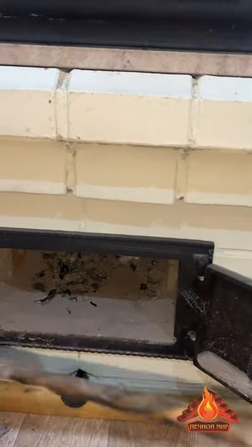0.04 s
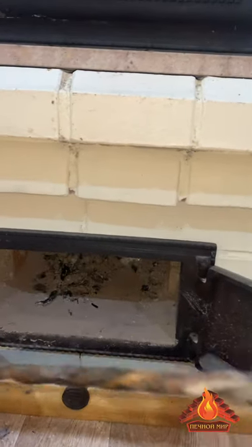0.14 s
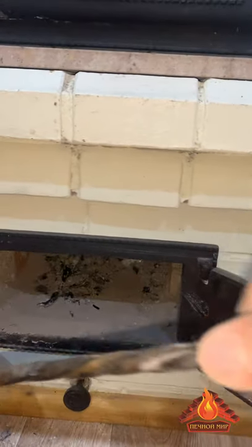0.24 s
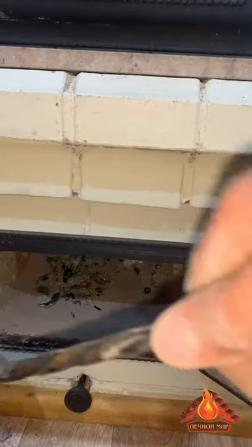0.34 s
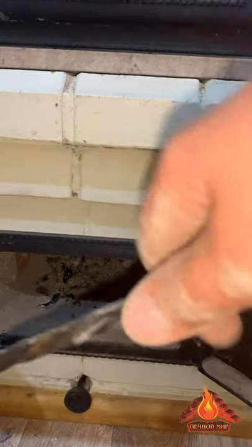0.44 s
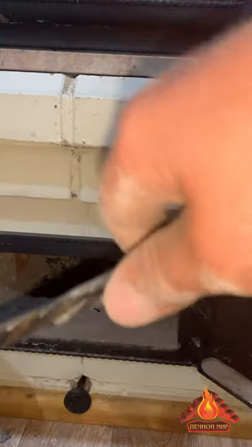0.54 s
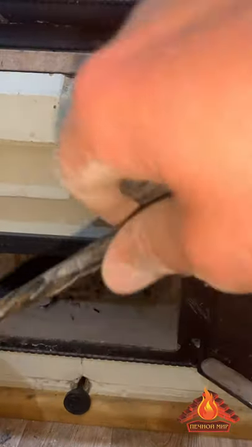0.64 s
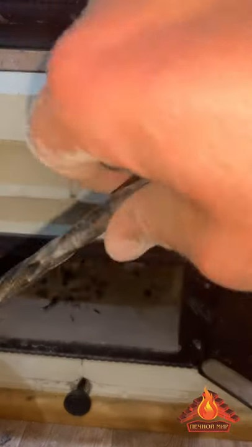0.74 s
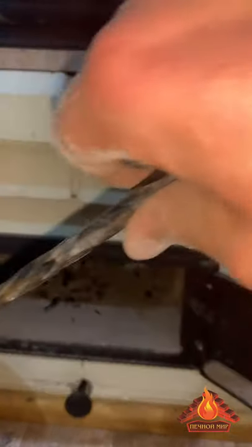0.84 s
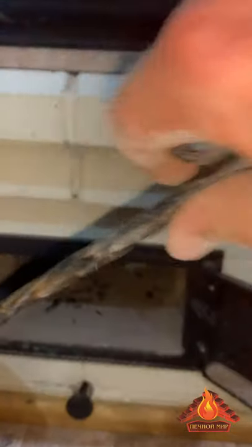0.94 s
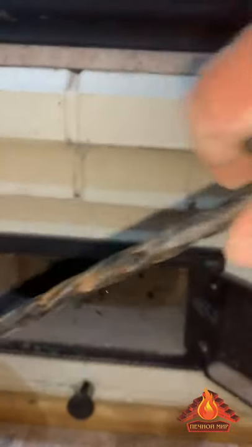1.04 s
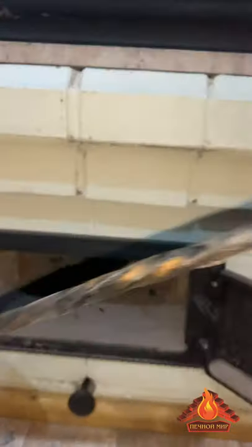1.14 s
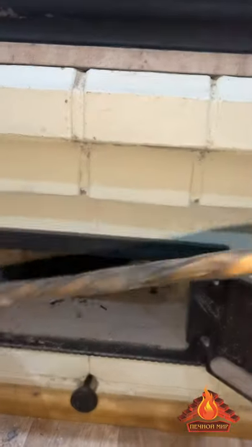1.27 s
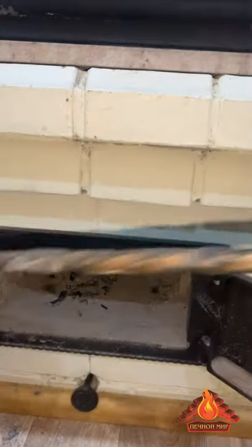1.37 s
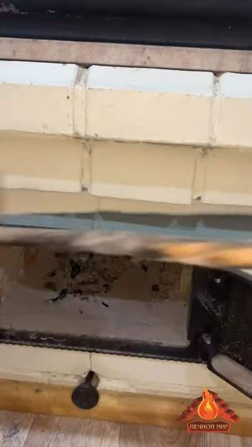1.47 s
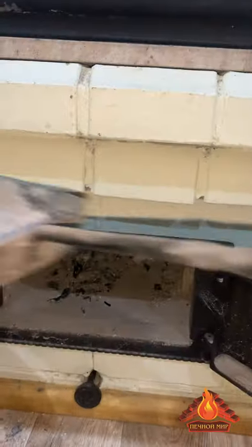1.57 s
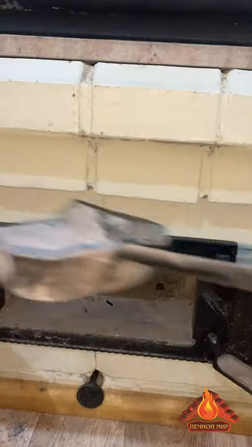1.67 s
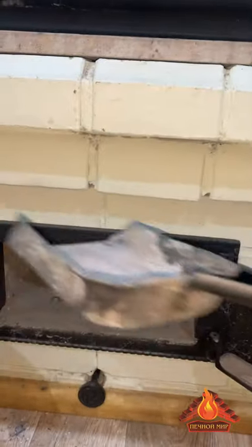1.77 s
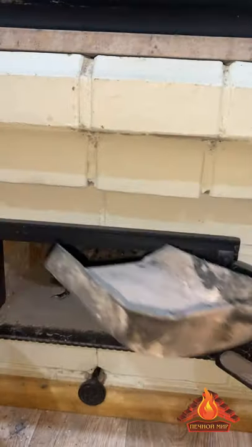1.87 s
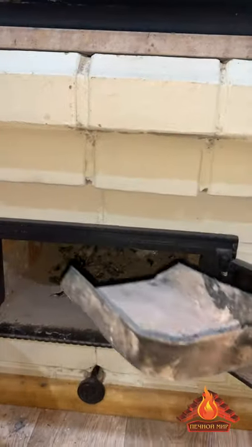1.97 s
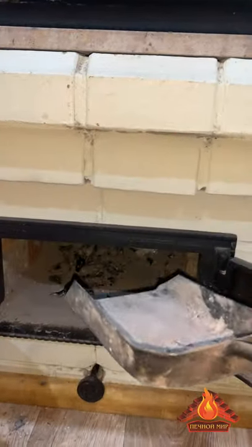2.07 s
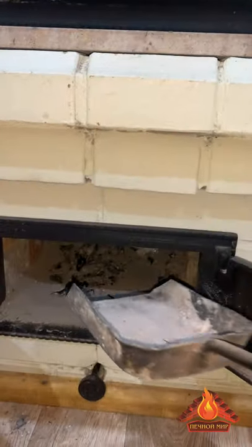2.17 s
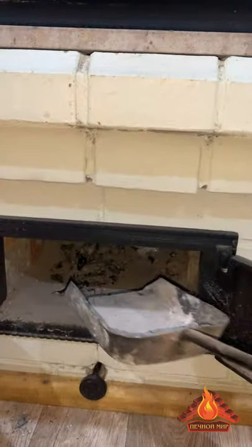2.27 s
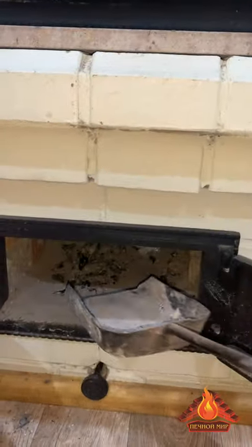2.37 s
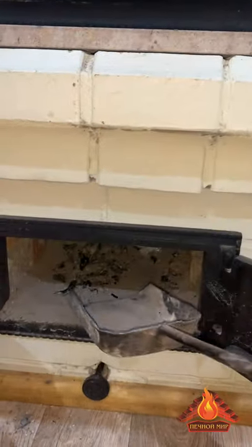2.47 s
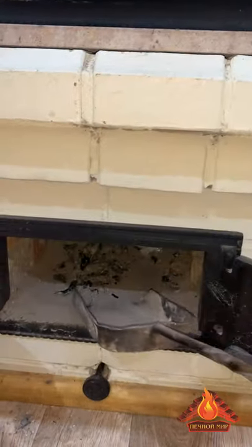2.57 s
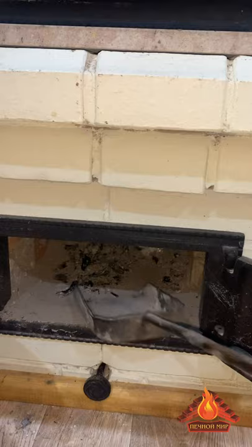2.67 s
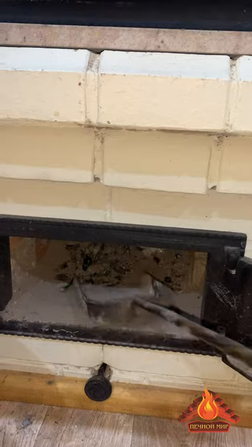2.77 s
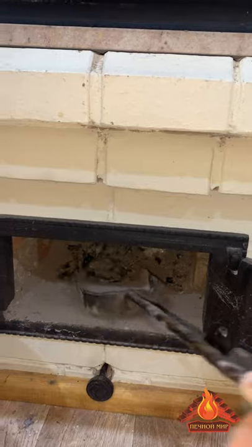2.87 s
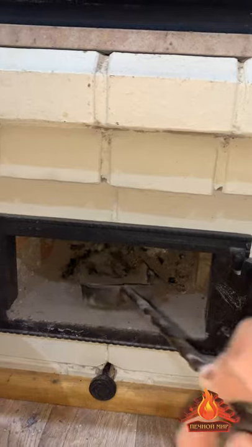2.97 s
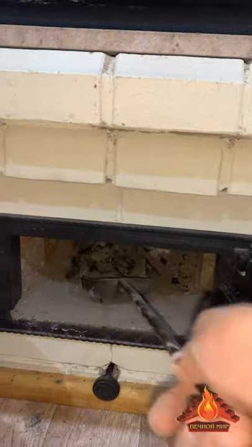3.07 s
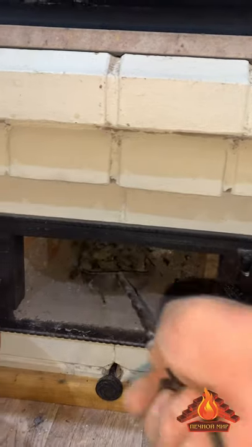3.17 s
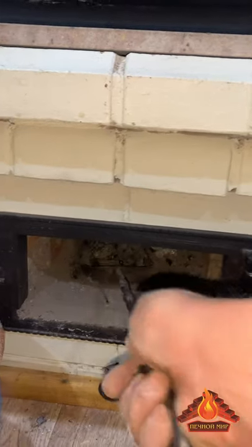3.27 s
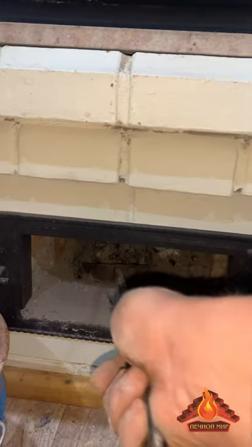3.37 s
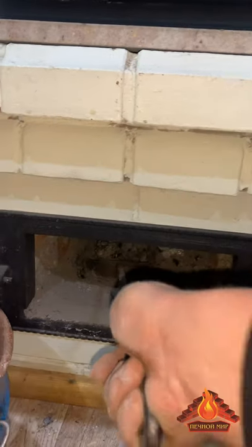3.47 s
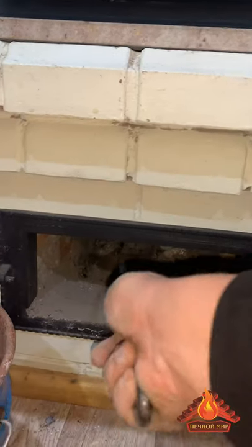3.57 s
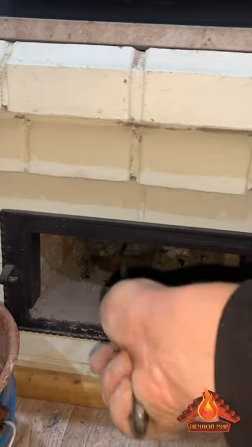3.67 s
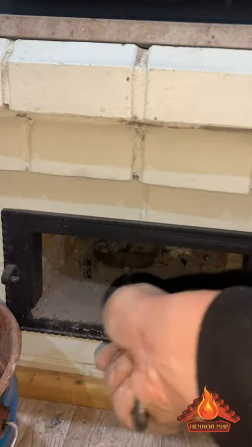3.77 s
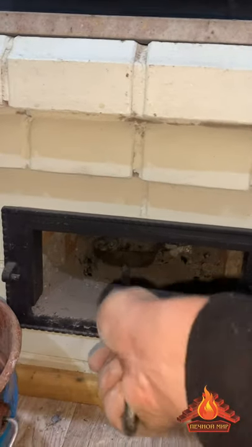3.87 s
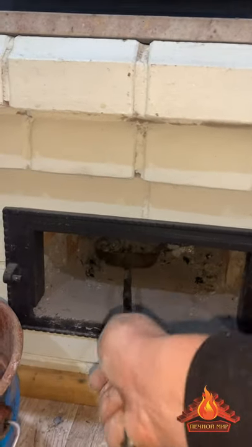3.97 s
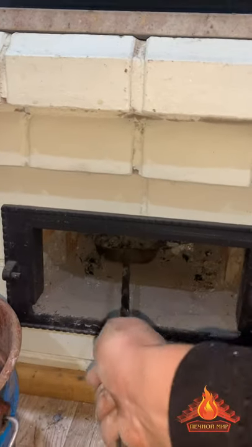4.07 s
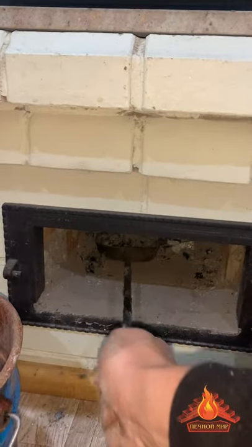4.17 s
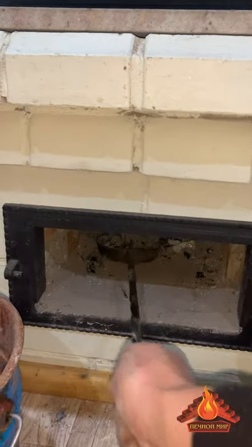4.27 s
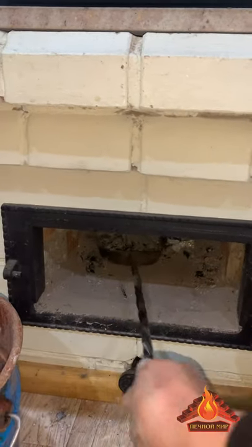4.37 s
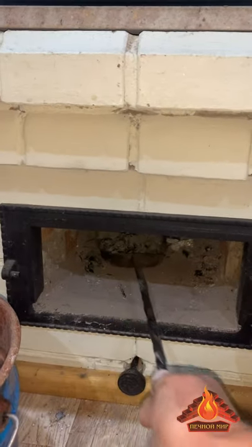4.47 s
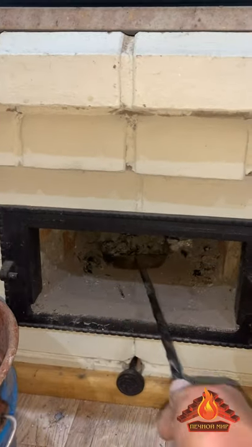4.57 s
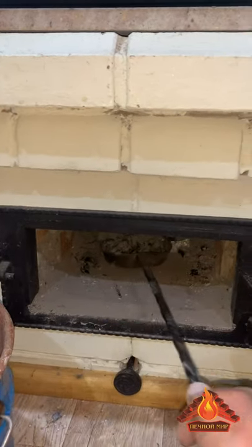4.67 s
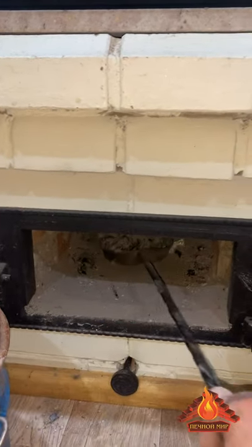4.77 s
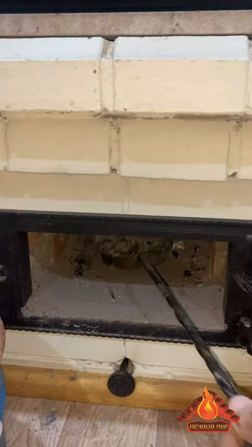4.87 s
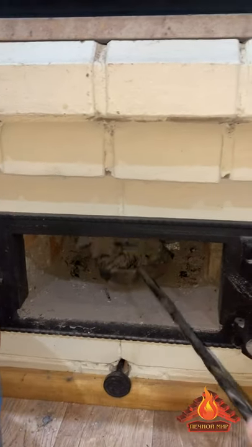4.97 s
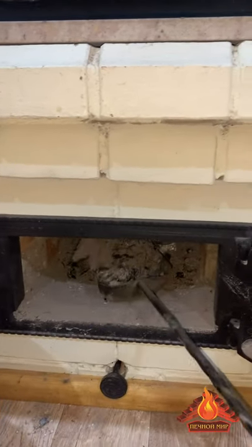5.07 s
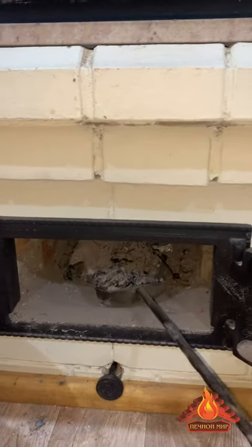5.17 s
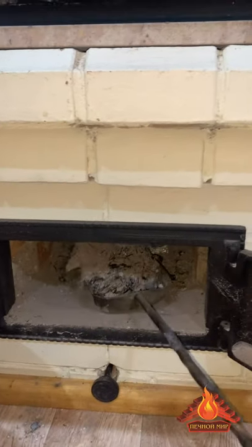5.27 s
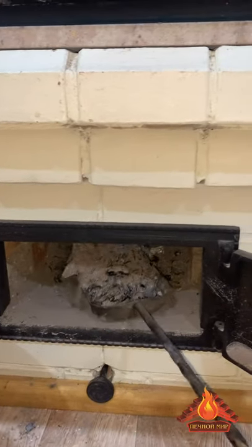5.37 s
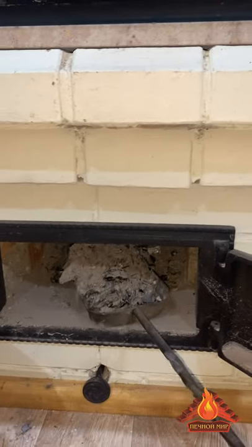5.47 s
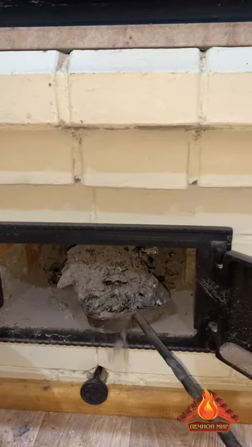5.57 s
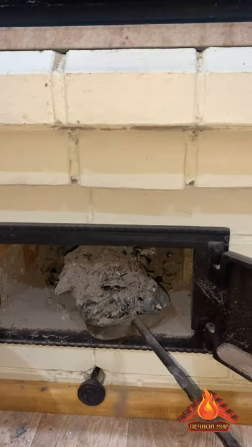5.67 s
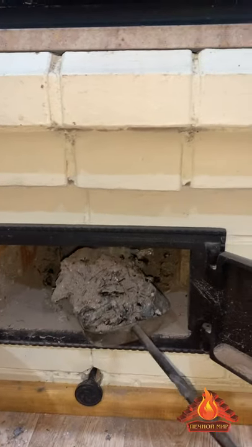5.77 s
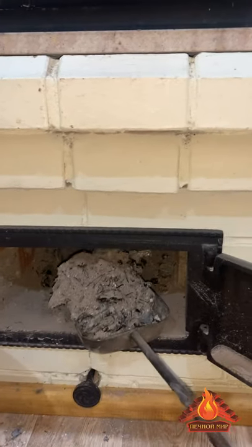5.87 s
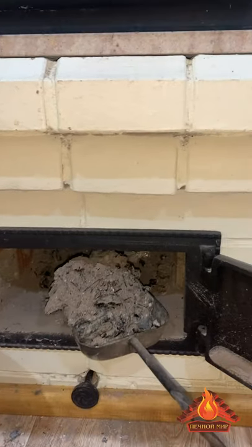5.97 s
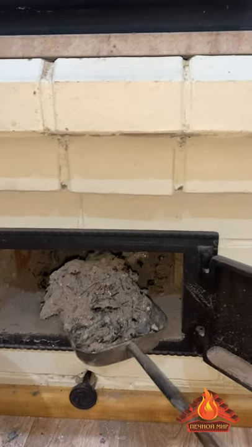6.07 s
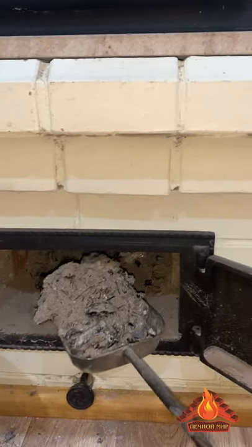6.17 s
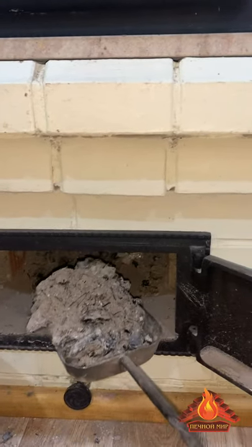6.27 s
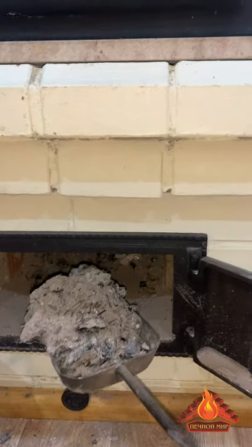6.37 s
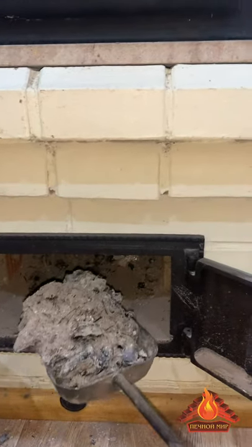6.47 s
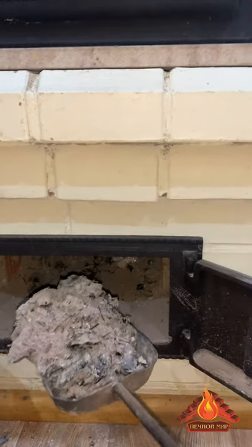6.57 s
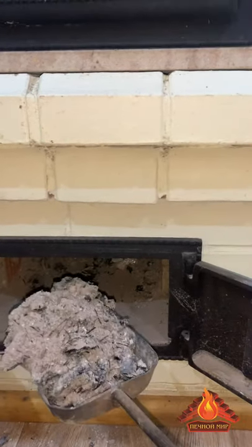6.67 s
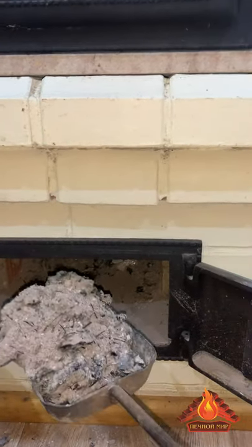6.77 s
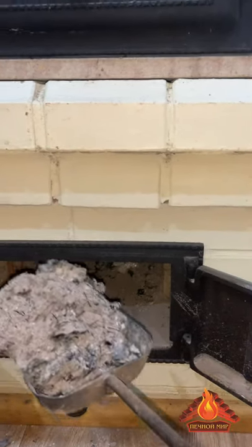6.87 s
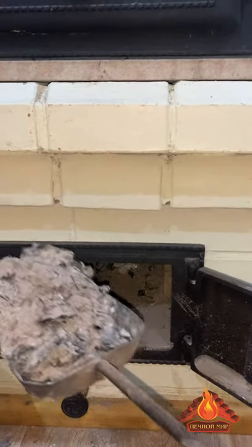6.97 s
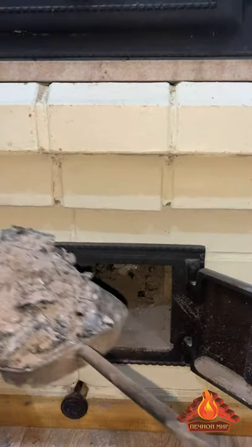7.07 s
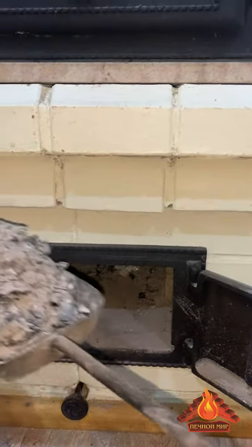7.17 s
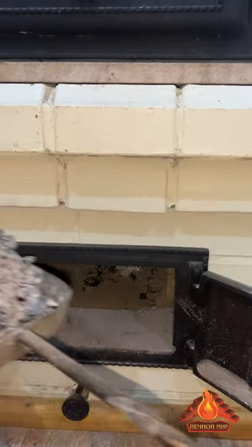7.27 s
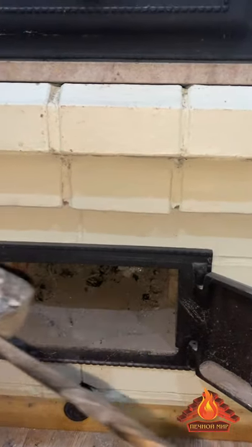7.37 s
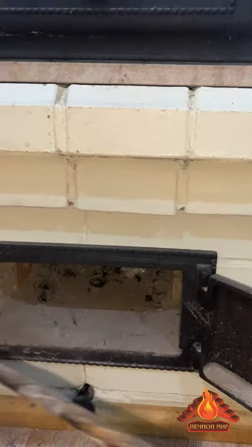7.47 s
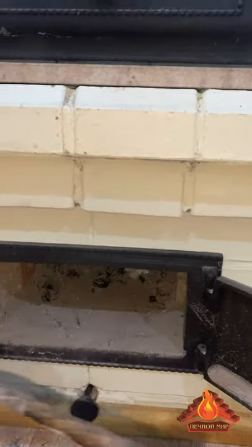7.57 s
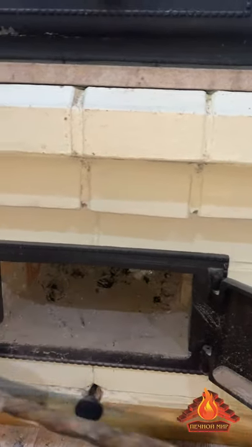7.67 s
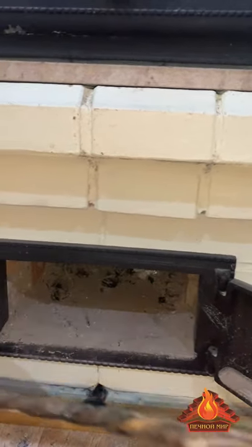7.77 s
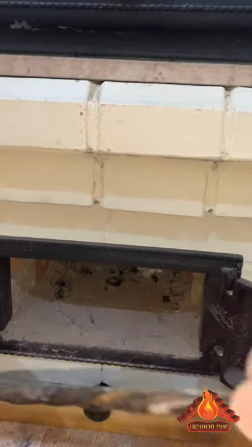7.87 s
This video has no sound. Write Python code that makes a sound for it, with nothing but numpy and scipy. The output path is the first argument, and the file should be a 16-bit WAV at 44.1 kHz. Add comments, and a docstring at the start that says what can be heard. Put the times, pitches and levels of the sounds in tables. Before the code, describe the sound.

A small, quiet indoor room with a low rumble and faint hiss, heard close in stereo. At 0.2-0.75 s a sleeve rustles very near, with crisp little fabric snaps, and a steel handle hums barely audibly. Faint cloth ticks end by 1.1 s, then quiet. At 2.6 s a metal scoop knocks, and hard bright clangs at 2.7-2.8 s lead into loud gritty scraping, ringing pan and short sliding squeals, until about 3.35 s. A second, duller ram into the ash at 3.47-3.8 s brings crunchy knocks and boxy thumps, with short brick echoes. From 4.0 s a little ash sifts and cinders tick; the withdrawal drag at 4.6-5.1 s is almost inaudible, with clearer clicks and a small knock near 5.1 s. Sparse faint ticks thin out by 5.7 s. Quiet follows until a cinder ticks at 7.0 s; a very faint thin handle tone comes at 7.4 s and soft sleeve snaps from 7.7 s to the end.

```python
"""A sleeve rustles up close and brushes a steel handle; a brief, faint swell leads into the first knock.
A scoop is rammed twice into the ash of a stove's brick chamber: noise grains ring the pan and boom the
chamber, and blows and squeaks cut through. It is drawn out full with a light drag: filtered grains give
sifting ash, short noise bursts the ticks of cinders. Last cinders tick, the handle sings faintly as a sine,
the sleeve returns. Under it lies a small, quiet room: shaped noise with a low rumble, and sparse echoes."""
import sys
import numpy as np
from scipy import signal
from scipy.fft import rfft, irfft, next_fast_len
from scipy.io import wavfile
from scipy.ndimage import uniform_filter1d

SR = 44100
rng = np.random.default_rng(int(sys.argv[2]) if len(sys.argv) > 2 else 0)


def master(y):
    """Save y as 16-bit WAV."""
    cut = np.clip(np.atleast_2d(y).T, -1, 1)
    pcm = np.round(cut * 32767)  # scale
    wavfile.write(sys.argv[1], SR, pcm.astype(np.int16))


N = 349713
TIME = np.arange(N) / SR
TAPS = 8192  # length of a full-circle body response, in samples
BINS = np.fft.rfftfreq(TAPS, 1 / SR)

# Event levels are relative: most layers add a trim of their own.
# pushes of the scoop: (start t/s, length t/s, grit hiss level/dB, pan ring level/dB, chamber boom level/dB)
PUSHES = [(2.598, 0.013, -43.5, -39, -33.5), (2.683, 0.031, -36.5, -24, -42.5),
          (2.733, 0.069, -30.5, -22, -46), (2.859, 0.14, -30.5, -28, -58),
          (3.036, 0.033, -28, -29.5, -55.5), (3.097, 0.062, -33, -29.5, -54),
          (3.165, 0.074, -31.5, -29.5, -48), (3.262, 0.068, -35, -28.5, -47.5),
          (3.354, 0.04, -59.5, -48.5, -67.5), (3.467, 0.0059, -36, -41, -60),
          (3.502, 0.019, -33, -30.5, -46.5), (3.53, 0.004, -26, -31.5, -29.5),
          (3.565, 0.0099, -37, -35.5, -31.5), (3.593, 0.0091, -53, -54, -45),
          (3.646, 0.021, -42.5, -52, -43), (3.731, 0.066, -31.5, -33, -35.5),
          (3.839, 0.017, -55.5, -59, -56), (3.901, 0.038, -51, -46.5, -58),
          (4.035, 0.11, -61.5, -53.5, -46.5), (4.289, 0.14, -71, -65, -50.5)]
# a brief, faint swell just before the first knock, and later the light drag of the scoop drawn out:
# (start t/s, length t/s, hiss level/dB, ring level/dB, boom level/dB)
SOFT_DRAGS = [(2.552, 0.014, -73, -70, -61.5), (4.57, 0.5, -89, -79, -73)]
# the blade strikes brick or a cinder: (t/s, peak level/dB, brightness f/Hz before softness, crunch t/s)
KNOCKS = [(2.59, -17.5, 630, 0.012), (2.651, -11.5, 1840, 0.0076), (2.6735, 1, 2000, 0.0013),
          (2.724, -7.5, 1520, 0.0014), (2.816, 3.5, 4200, 0.0086), (3.163, -10, 9000, 0.014),
          (3.174, -9, 8000, 0.0025), (3.472, -12.5, 5700, 0.0056), (3.495, -15.5, 7000, 0.0057),
          (3.527, -9.5, 4000, 0.0029), (3.537, -7, 3000, .008), (3.64, -16, 2120, 0.0033),
          (3.666, -14.5, 9050, 0.0044), (3.725, -14.5, 3000, .004), (3.764, -12, 5000, 0.0074),
          (3.804, -17, 1220, 0.0026), (3.847, -19.5, 6030, 0.0026), (4.299, -45, 1510, 0.0062),
          (4.38, -60, 1510, 0.0076), (4.419, -42.5, 501, 0.0066), (5.087, -28, 6460, 0.0053)]
# the edge catches and sings on single modes: (t/s, f/Hz, level/dB, held t/s, t60 t/s)
SQUEAKS = [(2.591, 635, -25, 0, .05), (2.591, 1040, -33, 0, .25), (2.591, 1635, -31, 0, .25),
           (2.595, 3120, -39, .04, .3), (2.6515, 1520, -9, 0, .17), (2.6515, 1631, -11, 0, .17),
           (2.6735, 1500, -5, 0, .014), (2.674, 1196, -21, 0, .22), (2.674, 1728, -19, 0, .2),
           (2.674, 1991, -19, 0, .15), (2.672, 5540, -18, 0, .087), (2.722, 7296, -32, .11, .06),
           (2.816, 1640, -19, 0, .09), (2.816, 1870, -19, 0, .05), (2.816, 1991, -18, 0, .08),
           (2.816, 3360, -20, 0, .04), (2.868, 1991, -34, .14, .15), (2.95, 6912, -47, .13, .12),
           (5.09, 2870, -57, .06, .12), (5.09, 1530, -55, 0, .2), (5.229, 1880, -56, 0, .1)]
# resonances that slide as the blade is pushed: (start t/s, length t/s, level/dB, from f/Hz, to f/Hz)
WHINES = [(2.742, 0.065, -28, 1434, 1217), (2.769, 0.079, -29, 1613, 1793),
          (2.878, 0.12, -30.5, 1843, 2037), (3.106, .08, -30, 2004, 1925),
          (3.171, 0.053, -30.5, 1160, 1087)]
# fine ash runs off the scoop: (start t/s, length t/s, level/dB)
SIFTING = [(4.038, 0.074, -46.5), (4.277, 0.087, -59), (4.576, 0.47, -75.5)]
# the largest loose cinders: (t/s, peak level/dB, pitch f/Hz, crumbling t/s)
CINDERS = [(4.002, -37, 9700, 0.0045), (4.043, -25, 10260, .006), (4.1464, -31.5, 11300, 0.0043),
           (4.2194, -39.5, 11770, 0.0046), (4.5209, -57, 11700, .004), (4.571, -55.5, 11400, .002),
           (4.6105, -49.5, 11580, 0.0057), (4.816, -54, 6000, .003), (4.9194, -51.5, 11710, 0.0022),
           (4.9604, -59, 1860, .002), (5.0145, -39, 3630, 0.0026), (5.031, -48.5, 6380, .002),
           (5.08, -34.5, 4010, 0.0057), (5.0888, -27, 5450, 0.0039), (5.23, -43.5, 3600, 0.0022),
           (5.315, -58, 5600, .002), (5.489, -55, 10400, 0.0078), (5.7053, -54.5, 11160, .005),
           (6.9666, -30, 6000, .004), (7.081, -48, 3545, 0.00201)]
# the hand brushes the free handle: (start t/s, length t/s, f/Hz, peak level/dB, t60 t/s)
HANDLE_RINGS = [(.76, .02, 619, -69, 1.6), (.76, .02, 1227, -80, 1.3), (7.38, .12, 2875, -79, .7)]
# movements of the sleeve: (start t/s, length t/s, rustle level/dB, lowest f/Hz)
SLEEVE_MOVES = [(0.317, 0.42, -54, 100), (7.55, .15, -91, 2020), (7.923, .04, -49.5, 1740)]
# folds of the sleeve snap over: (t/s, peak level/dB, resonance f/Hz, snap t/s)
FOLDS = [(0.236, -35, 7000, .001), (0.2706, -26, 11800, 0.0012), (0.304, -27, 11300, 0.006),
         (0.3166, -18, 5400, 0.0046), (0.328, -23, 7560, 0.0053), (0.3456, -28, 10700, 0.0045),
         (0.4948, -25.5, 10700, 0.0042), (0.6736, -26, 5500, 0.017), (0.744, -29.5, 11600, 0.015),
         (.896, -55, 5860, .002), (0.95, -51, 14000, 0.0023), (1, -51.5, 10600, 0.0041),
         (1.079, -58, 4500, 0.0024), (7.7228, -37, 5200, 0.0018), (7.813, -34, 9930, 0.0043),
         (7.897, -37, 6000, 0.0072)]

# modes of the scoop: (f/Hz, width f/Hz, level/dB above the spectrum when empty, level/dB when buried in ash)
SCOOP_MODES = [(635, 40, 13, 17), (1180, 60, 7, 4), (1255, 60, 4, 9), (1385, 40, 1, -5), (1525, 25, 7, -5),
               (1642, 42, 16, 16), (1920, 60, 7, 3), (1992, 32, 15, 8), (2065, 100, 3, 15),
               (2660, 50, 3, -9), (2890, 80, 0, 12), (3360, 30, 7, 0), (3608, 36, 8, 8), (3930, 60, 7, 0),
               (4270, 110, -3, 10), (5530, 45, 12, 11), (5400, 130, 3, 10), (6050, 70, 10, 6),
               (6220, 90, 8, 13), (6540, 35, 5, 13), (6912, 26, 11, 5), (7296, 26, 10, 3),
               (7700, 170, 11, 2), (8270, 170, 10, 9), (9842, 36, 12, 10), (10060, 60, 10, 6),
               (10660, 45, 6, 10), (11275, 42, 16, 10), (11700, 50, 14, 3), (12220, 130, 14, 9),
               (13595, 50, 10, 6), (14972, 42, 14, 10)]
# long-ringing modes of the steel handle, held free: (f/Hz, relative level/dB, t60 t/s)
HANDLE_MODES = [(622, -23, 1.2), (1196, -14, 0.25), (1314, -16, .25), (1432, -18, .25), (1520, -12, .3),
                (1631, -11, .3), (1728, -14, .3), (1991, -6, 0.3), (2148, -21, 1.2), (2875, -25, 2.6),
                (3120, -17, .35), (3359, -15, .5), (5537, -13, 0.25), (5789, -12, .2), (6038, -12, .25),
                (6188, -13, .25), (6911, -11, .3), (7188, -13, .2), (7296, -9, 0.25), (7618, -13, .2),
                (7784, -13, .2), (9842, -11, .3), (11268, -13, .25), (11680, -11, .3), (13591, -12, .3),
                (14974, -13, .3)]
# modes of the chamber's air, and of the room: (f/Hz, width f/Hz, level/dB above the spectrum)
CHAMBER_MODES = [(245, 64, 6), (295, 30, 8), (335, 25, 8), (396, 16, 15), (634, 14, 18)]
ROOM_MODES = [(47, 3.9, 22), (128, 37, 6.8), (166.9, 22, 7.4), (283, 38, 10)]
# relative spectra of each material and of the room's air: (f/Hz, level/dB)
STEEL_SPECTRUM = [(100, -17), (200, -16.5), (480, -24.5), (640, -7.5), (830, -11), (1050, -1), (1450, -7.5),
                  (1800, -7), (2100, -4), (2450, -5), (2750, 0), (4000, 0.5), (5000, -1.5), (7000, -3),
                  (9300, -8), (10800, -5.5), (13500, -12), (15700, -6.5)]
CHAMBER_SPECTRUM = [(25, -38), (50, -14), (100, -7), (180, 1.5), (280, -1.5), (400, -8), (520, -21),
                    (800, -13), (1100, -9), (3000, -45)]
ASH_SPECTRUM = [(500, 1), (3000, -11.5), (6000, -4.5), (8500, -6.5), (12500, 0), (15500, -5)]
CINDER_SPECTRUM = [(200, 8), (800, -17.5), (1500, -6), (3000, -5), (7000, -3.5), (12000, -1), (15500, -5)]
CLOTH_SPECTRUM = [(150, -27), (290, 8.5), (480, -25.5), (640, -5.5), (1100, -5.5), (1350, -9.5),
                  (2500, -9.5), (3500, -9), (5500, -3.5), (7500, -7.5), (11000, -4), (13000, -7.5),
                  (15500, -14)]
AIR_SPECTRUM = [(20, -33.5), (32, -19.5), (50, -18), (80, -8.5), (140, -3.5), (210, -10.5), (300, -8),
                (480, -15), (850, -24), (2000, -27.5), (4000, -36.5), (8000, -41), (13500, -37.5),
                (15500, -45)]
# decay of the brick chamber and of the room: (f/Hz, t60 t/s)
CHAMBER_T60 = [(200, 0.019), (1500, 0.14), (6000, 0.015), (15000, 0.1)]
ROOM_T60 = [(150, 0.1), (600, 0.18), (3000, 0.33), (8000, 0.13), (15000, 0.15)]
# the two microphone ports: (f/Hz, phase by which left leads/rad)
PORT_PHASE = [(0, 0), (260, -3.5), (420, -6), (620, -5.2), (860, -2.5), (1460, -5.9), (1720, -6.2),
              (2150, -4.7), (2600, -4.3), (3360, -5.1), (4750, -3.14), (15400, 12.57)]
# left over right at the ports: (f/Hz, level/dB)
PORT_BALANCE = [(60, 3), (99, 1.5), (160, -1.5), (270, 3.5), (450, -2.5), (740, 4), (1220, 0), (2010, -0.7),
                (3330, -0.5), (15000, 0.3)]
# likeness of the two channels in echoes and in air: (f/Hz, likeness -1..1)
ECHO_LIKENESS = [(100, 0.32), (500, 0.067), (2800, 0.15), (4200, .85), (15000, 0.85)]
AIR_LIKENESS = [(40, 0.73), (75, -0.28), (130, 1), (290, -0.22), (640, -0.55), (1410, -0.74), (3100, -0.72),
                (6820, -0.056), (15000, -0.65)]

# envelopes of a movement that rises, sags while it lasts, and stops: (rise, sag, fall), each level/dB per s
HISS_SHAPE = (1100, 3, 390)
RING_SHAPE = (1600, 40, 380)
BOOM_SHAPE = (900, 65, 450)
SOFT_SHAPE = (130, 1.2, 77)
SPILL_SHAPE = (270, 7.8, 142)
ARM_SHAPE = (116, 3.1, 137)

BURIED_S = 3.42  # from here on the pan is buried in the ash


def scrape(hiss_db=3, ring_db=2, boom_db=2, chatter_db=2.03, chatter_hz=70, lean_db=2.5, lean_hz=35,
           split_hz=2400):
    """Grit sticks and slips under the blade: speed gives hiss, pressure rings the pan and shakes the chamber."""
    hiss, ring, boom = pushes()
    chatter = evened(amp(chatter_db * wobble(chatter_hz)))  # the blade judders over uneven brick
    lean = evened(amp(lean_db * wobble(lean_hz)))  # the pan rocks, so its pressure wavers apart from its speed
    fine = cut(grains(per_s=1400, spread_db=4, dust=0.15), 4, split_hz, "high")
    coarse = cut(grains(per_s=600, spread_db=2.6, dust=0.08), 4, split_hz, "low")
    force = chatter * (amp(hiss_db) * hiss * fine + amp(ring_db) * ring * lean * coarse)

    pan = np.zeros(N)
    for here in places(per_s=21, count=9):  # the contact wanders along the edge
        for buried in (False, True):
            now = (TIME > BURIED_S) == buried
            pan += through(force * here * now, struck(buried, uneven_db=4.5, shift_hz=17))

    shove = chatter * grains(per_s=910, spread_db=3.0, dust=0.084)
    return pan + through(amp(boom_db) * boom * shove, body(CHAMBER_SPECTRUM, CHAMBER_MODES))


def pushes():
    """Gains of hiss, ring and boom: each push bites, sags and stops; the soft swell and drag rise gently."""
    moves = [(row, (HISS_SHAPE, RING_SHAPE, BOOM_SHAPE)) for row in PUSHES]
    moves += [(row, [SOFT_SHAPE] * 3) for row in SOFT_DRAGS]
    gains = np.zeros((3, N))
    for (start, length, *levels), shapes in moves:
        gains += np.array([gesture(start, length, db, shape) for db, shape in zip(levels, shapes)])
    return gains


def struck(buried, uneven_db, shift_hz=0):
    """The scoop, empty or buried, at one point of contact, which favours some modes and detunes them."""
    favour, detune = rng.standard_normal((2, len(SCOOP_MODES)))
    modes = []
    for (hz, width, empty_db, buried_db), extra, off in zip(SCOOP_MODES, favour, detune):
        level = buried_db if buried else empty_db
        modes.append((hz + shift_hz * off, width, level + uneven_db * extra))
    return body(STEEL_SPECTRUM, modes)


def knocks(level_db=-8, softness=0.93):
    """Blows excite the scoop's modes; a low-pass on the force makes a softer blow duller."""
    out = np.zeros(N)
    for s, db, hz, seconds in KNOCKS:
        keep = np.exp(-2 * np.pi * hz / softness / SR)
        force = signal.lfilter([1 - keep], [1, -keep], crunch(seconds, crumble=0.13, order=3))
        blow = signal.fftconvolve(force, struck(s > BURIED_S, uneven_db=3.0))
        add(out, s, amp(db + level_db) * peaked(blow))
    return out


def thumps(level_db=-36):
    """Every blow also shakes the chamber floor a little, exciting the chamber's low modes."""
    out, floor = np.zeros(N), body(CHAMBER_SPECTRUM, CHAMBER_MODES)
    for s, db, _, seconds in KNOCKS:
        thump = signal.fftconvolve(crunch(seconds, crumble=0.34), floor)
        add(out, s, amp(db + level_db) * peaked(thump))
    return out


def squeaks(rise_s=0.001, waver=0.003, flutter_db=4.5):
    """The edge catches on brick: a mode sings unsteadily while the edge drags, then rings out."""
    out, t = np.zeros(N), TIME[:SR // 2]
    drift, grip = 1 + waver * wobble(150), amp(flutter_db * wobble(82))
    for s, hz, db, hold, t60 in SQUEAKS:
        span = slice(round(s * SR), round(s * SR) + len(t))
        # a held tone flutters with the grip, and keeps its last value once released
        pressure = np.interp(np.minimum(t, hold), t, grip[span]) if hold > rise_s else 1
        attack = 1 - np.exp(-t / rise_s)
        ring_out = 1000 ** (-np.maximum(t - hold, 0) / t60)
        tone = np.sin(2 * np.pi * hz * np.cumsum(drift[span]) / SR)
        add(out, s, amp(db) * pressure * attack * ring_out * tone)
    return out


def whines(width_hz=45):
    """The load on the blade shifts as it slides, bending one of its resonances up or down."""
    out, keep = np.zeros(N), np.exp(-np.pi * width_hz / SR)
    for s, length, db, from_hz, to_hz in WHINES:
        hz = np.interp(TIME, [s, s + length], [from_hz, to_hz])
        shiver = evened(signal.lfilter([1 - keep], [1, -keep], rng.standard_normal(N)))
        out += gesture(s, length, db, RING_SHAPE) * shiver * np.sin(2 * np.pi * np.cumsum(hz) / SR)
    return out


def handle(x, damping):
    """Vibration rings on in the handle's pure decaying modes; damping adds decay in dB per s."""
    t = TIME[:SR]
    modes = np.zeros(SR)
    for hz, db, t60 in HANDLE_MODES:
        modes += amp(db - damping * t) * 1000 ** (-t / t60) * np.sin(2 * np.pi * hz * t)
    return through(x, modes / np.linalg.norm(modes))


def handle_rings(rise_db_per_s=150):
    """A light brush of the hand sets the free handle ringing in a thin, clean tone."""
    out = np.zeros(N)
    for s, length, hz, db, t60 in HANDLE_RINGS:
        out += gesture(s, length, db, (rise_db_per_s, 0, 60 / t60)) * np.sin(2 * np.pi * hz * TIME)
    return out


def sifting(level_db=3, clump_db=4.0):
    """Fine ash slides off the heap in little clumps as the scoop is lifted and drawn back."""
    spills = sum(gesture(*spill, SPILL_SHAPE) for spill in SIFTING)
    flow = spills * evened(amp(clump_db * wobble(37.4)))
    ash = grains(per_s=2500, spread_db=4.5, dust=0.7)
    return through(amp(level_db) * flow * ash, body(ASH_SPECTRUM))


def cinders(level_db=-5, width_hz=1200, ring_db=6):
    """Falling and settling cinders: light, dry ticks, each a crumbling contact with a pitch of its own."""
    out = np.zeros(N)
    for s, db, hz, seconds in CINDERS:
        stone = body(CINDER_SPECTRUM, [(hz, width_hz, ring_db)])
        tick = signal.fftconvolve(crunch(seconds, crumble=0.7), stone)
        add(out, s, amp(db + level_db) * peaked(tick))
    return out


def crumbs(start_s=4.4, length_s=0.9, level_db=-77):
    """Small cinders trickle off the heap in uneven clumps, each a faint dry tick."""
    falls = ticks(CINDER_SPECTRUM, 1500, 6000, per_s=90, spread_db=2.5)
    drops = through(falls, crunch(seconds=0.002, crumble=0.5))
    trickle = evened(drops * amp(4 * wobble(18)))
    return gesture(start_s, length_s, level_db, SOFT_SHAPE) * trickle


def sleeve(rustle_db=4, folds_db=-7, patchy_db=4.0, width_hz=2500, ring_db=7):
    """Threads rub over each other in a fine hiss with separate scratches; now and then a fold snaps."""
    out = np.zeros(N)
    threads = through(grains(per_s=2100, spread_db=4, dust=1.1), body(CLOTH_SPECTRUM))
    scratches = .65 * ticks(CLOTH_SPECTRUM, 1400, 11000, per_s=330, spread_db=3)
    rustle = (threads + scratches) * amp(rustle_db + patchy_db * wobble(53))
    for s, length, db, lowest_hz in SLEEVE_MOVES:
        out += gesture(s, length, db, ARM_SHAPE) * cut(rustle, 2, lowest_hz, "high")
    for s, db, hz, seconds in FOLDS:
        fold = body(CLOTH_SPECTRUM, [(hz, width_hz, ring_db)])
        snap = signal.fftconvolve(crunch(seconds, crumble=0.98), fold)
        add(out, s, amp(db + folds_db) * peaked(snap))
    return out


def chamber(x, direct_db, walls_db):
    """The close brick walls smear the sound; their pattern of echoes changes over time."""
    walls = sum(echoes(x * here, CHAMBER_T60, first_s=0.00022, per_s=13000) for here in places(per_s=3.95))
    return amp(direct_db) * x + amp(walls_db) * walls


def echoes(x, t60, first_s, per_s):
    """Sparse reflections of random sign, each band dying at its own speed; left response has energy 1."""
    count = SR // 2
    hits = (rng.random((2, count)) < per_s / SR) * (TIME[:count] > first_s)
    taps = rng.choice([-1., 1.], (2, count)) * hits
    hz, t, z = signal.stft(taps, SR, nperseg=256)
    z = pair(*z, read(ECHO_LIKENESS, hz)[:, None]) * 1000 ** (-t / read(t60, hz)[:, None])
    tail = signal.istft(z, SR, nperseg=256)[1]
    return signal.oaconvolve(x[None], tail / np.linalg.norm(tail[0]), axes=1)[:, :N]


def ports(x):
    """Sound reaches the two microphone ports with a difference in phase and level."""
    size = next_fast_len(N + TAPS)
    hz = np.fft.rfftfreq(size, 1 / SR)
    lag = np.interp(hz, *np.transpose(PORT_PHASE))
    tilt = amp(read(PORT_BALANCE, hz) / 2)
    return irfft(rfft(x, size) * np.array([tilt, np.exp(-1j * lag) / tilt]), size)[:, :N]


def air(start_db=-56.5, drift_db_per_s=-0.2131):
    """The room's low rumble under a faint hiss: shaped noise that sinks very slowly in level."""
    hz = np.fft.rfftfreq(N, 1 / SR)
    noise = pair(*rfft(rng.standard_normal((2, N))), read(AIR_LIKENESS, hz))
    shaped = noise * amp(colour_db(AIR_SPECTRUM, ROOM_MODES, hz))
    return evened(irfft(shaped, N)) * amp(start_db + drift_db_per_s * TIME)


def gesture(start, length, db, shape):
    """Gain of one movement: it rises to its level at the start, sags for its length, then falls away."""
    rise, sag, fall = shape
    t = TIME - start
    before, during, after = np.minimum(t, 0), np.clip(t, 0, length), np.maximum(t - length, 0)
    return amp(db + rise * before - sag * during - fall * after)


def places(per_s, count=5):
    """Weights that hand the sound round a ring of positions; their squares sum to 1."""
    away = (TIME * per_s - np.arange(count)[:, None] + count / 2) % count - count / 2
    return np.cos(np.pi / 2 * np.minimum(abs(away), 1))


def grains(per_s, spread_db, dust):
    """Tiny slips of uneven size over a share of fine dust noise, rms 1 before dust and again after."""
    size = amp(spread_db * np.minimum(rng.exponential(1, N), 4))
    slips = size * rng.choice([-1, 1], N) * (rng.random(N) < per_s / SR)
    return evened(evened(slips) + dust * rng.standard_normal(N))


def ticks(spectrum, low_hz, high_hz, per_s, spread_db, count=6):
    """Sparse, separate ticks of uneven size, in several pitches, rms 1."""
    out = np.zeros(N)
    for hz in np.geomspace(low_hz, high_hz, count):
        hits = grains(per_s / count, spread_db, dust=0)
        out += through(hits, body(spectrum, [(hz, hz / 8, 14)]))
    return evened(out)


def crunch(seconds, crumble, order=1):
    """A sharp contact and the crumbling that dies away after it; a higher order holds on, then stops short."""
    t = TIME[:TAPS // 2]
    force = crumble * rng.standard_normal(len(t)) * np.exp(-(t / seconds) ** order)
    force[0] += 1
    return force


def colour_db(spectrum, modes, hz):
    """A smooth spectrum with resonance peaks standing on it."""
    peaks = sum(amp(db) ** 2 / (1 + (2 * (hz - f) / width) ** 2) for f, width, db in modes)
    return read(spectrum, hz) + 10 * np.log10(1 + peaks)


def body(spectrum, modes=()):
    """Causal, minimum-phase impulse response of that colour, energy 1."""
    log_gain = np.log(amp(colour_db(spectrum, modes, BINS)))
    circle = np.concatenate([log_gain, log_gain[-2:0:-1]])
    response = np.fft.ifft(np.exp(np.conj(signal.hilbert(circle)))).real
    return response / np.linalg.norm(response)


def wobble(rate_hz):
    """Smooth chance of rms 1: noise with little left above rate_hz."""
    hz = np.fft.rfftfreq(N, 1 / SR)
    return evened(irfft(rfft(rng.standard_normal(N)) * np.exp(-(hz / rate_hz) ** 2), N))


def pair(a, b, likeness):
    """Two channels from two unrelated spectra, alike by the given amount."""
    same = np.clip(likeness, -1, 1)
    return np.array([a, same * a + np.sqrt(1 - same ** 2) * b])


def cut(x, order, hz, kind):
    """Butterworth filter, "high" or "low" pass."""
    return signal.sosfilt(signal.butter(order, hz, kind, fs=SR, output="sos"), x)


def through(x, response):
    """Passes a sound through an impulse response."""
    return signal.oaconvolve(x, response)[:N]


def add(mix, s, sound):
    """Mixes a sound in at time s."""
    part = mix[max(round(s * SR), 0):][:len(sound)]
    part += sound[:len(part)]


def peaked(x):
    """Scales a hit so that its loudest millisecond has rms 1."""
    return x / np.sqrt(uniform_filter1d(x ** 2, SR // 1000).max())


def evened(x):
    """Scales to rms 1."""
    return x / np.sqrt(np.mean(x ** 2) + 1e-20)


def read(points, hz):
    """Reads a table on a log-frequency axis."""
    f, value = np.transpose(points)
    return np.interp(np.log(hz + 1), np.log(f + 1), value)


def amp(db):
    """Decibels to gain."""
    return 10 ** (np.asarray(db) / 20)


def scene(stove_wet_db=-13, near_wet_db=-8, brushed_db=-26, handle_db=-11, buried_db=-11):
    """The scoop inside the stove, sleeve and cinders in front of it, all in one room."""
    drag, blows = scrape(), knocks() + thumps()
    edge = squeaks() + whines() + sifting()
    near = sleeve() + cinders() + crumbs()

    stove = chamber(drag, direct_db=-0.5, walls_db=-4) + chamber(blows, direct_db=-1, walls_db=-3.5) + edge
    shake = amp(handle_db + buried_db * (TIME > BURIED_S)) * (drag + blows)
    stove += handle(shake, damping=130)  # work in the ash damps the handle
    stove += handle(amp(brushed_db) * near, damping=0) + handle_rings()

    sent = amp(stove_wet_db) * (drag + blows + edge) + amp(near_wet_db) * near
    room = echoes(sent, ROOM_T60, first_s=0.0035, per_s=1700)
    return ports(stove + near + room) + air()


def record(dry, low_cut_hz=36, ceiling=.8, edge_hz=15950):
    """Low cut, soft overload towards the ceiling, and a steep band limit."""
    thinned = cut(dry, 4, low_cut_hz, "high")
    rounded = thinned / (1 + (thinned / ceiling) ** 4) ** .25
    band = signal.firwin(511, edge_hz, window=("kaiser", 9), fs=SR)
    return signal.oaconvolve(rounded, band[None], "same")


dry = scene()
out = record(dry)
master(out)
```